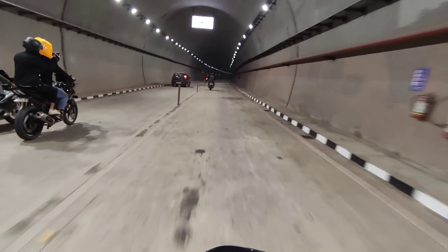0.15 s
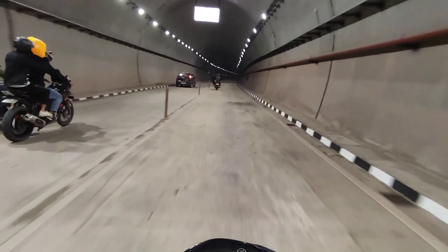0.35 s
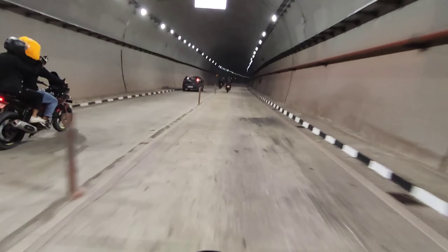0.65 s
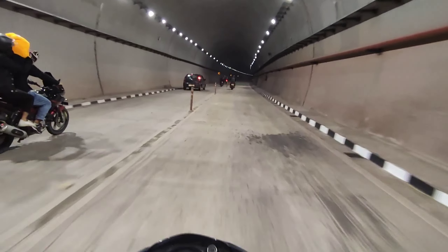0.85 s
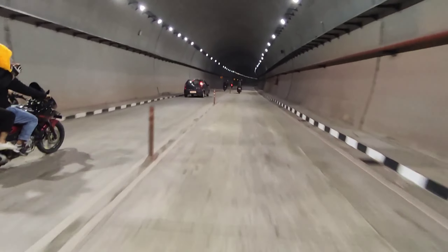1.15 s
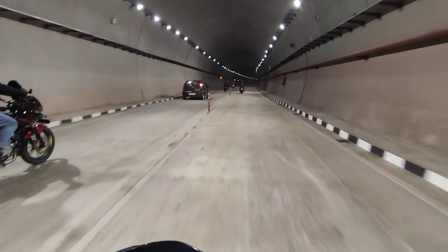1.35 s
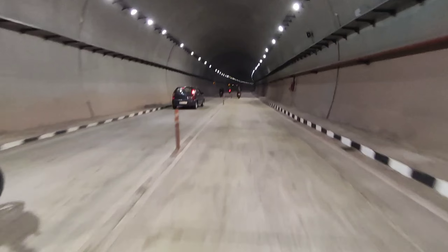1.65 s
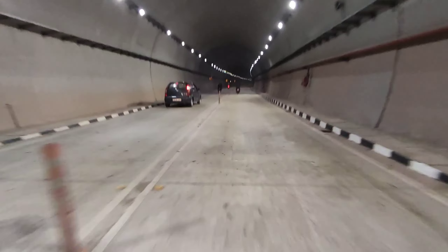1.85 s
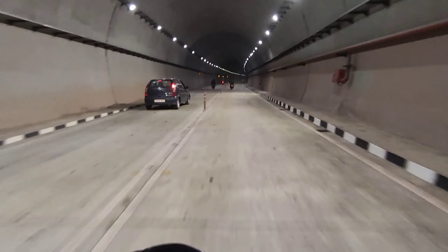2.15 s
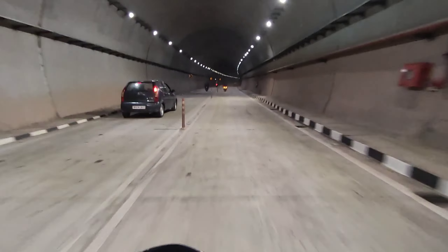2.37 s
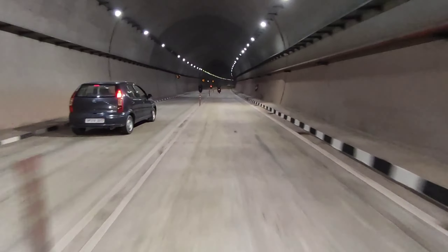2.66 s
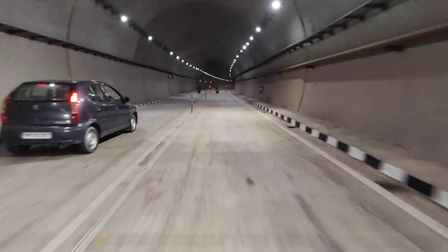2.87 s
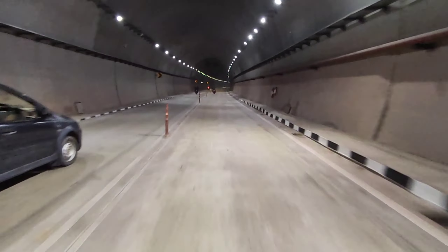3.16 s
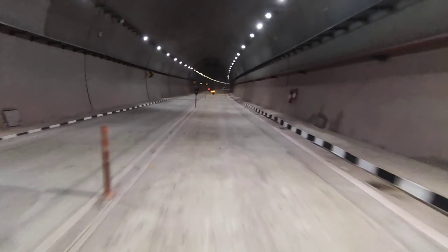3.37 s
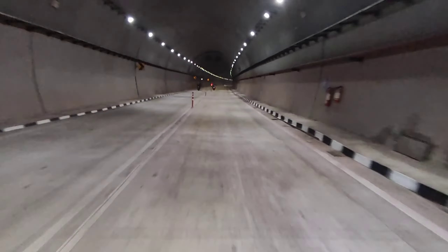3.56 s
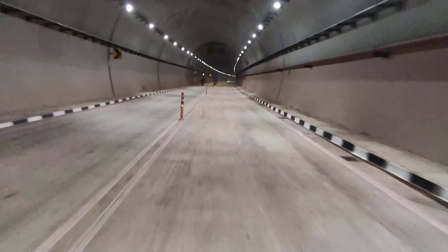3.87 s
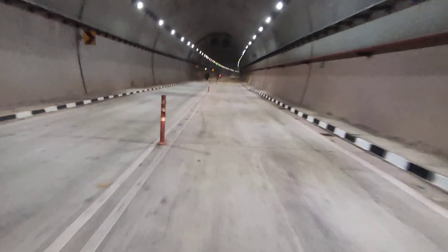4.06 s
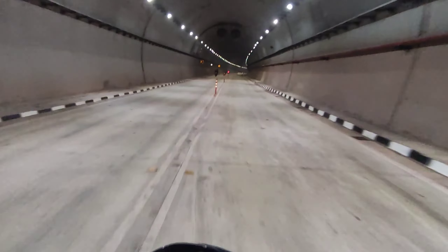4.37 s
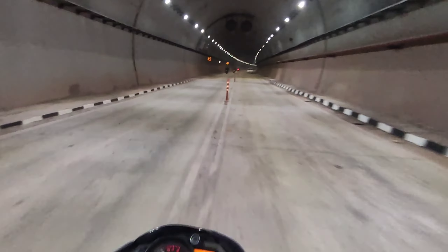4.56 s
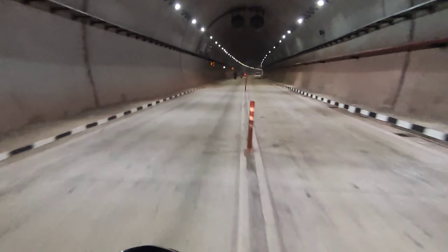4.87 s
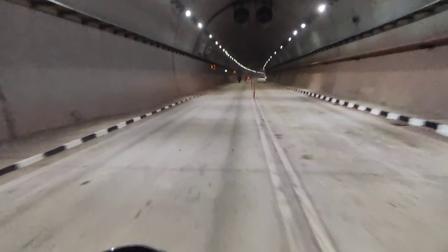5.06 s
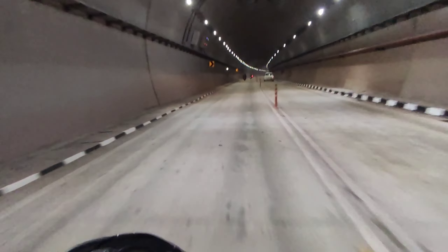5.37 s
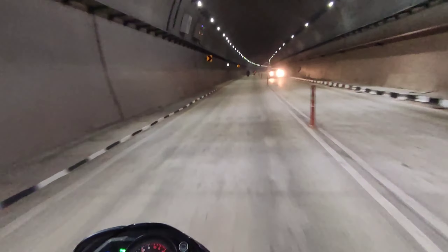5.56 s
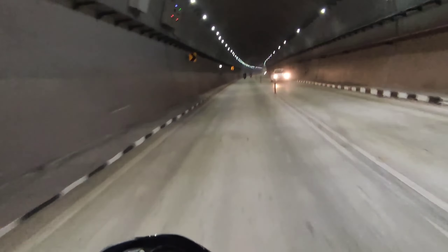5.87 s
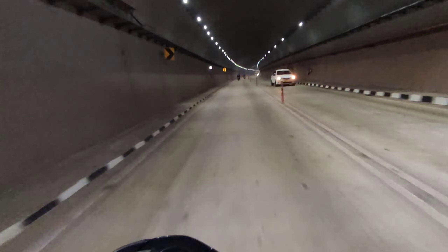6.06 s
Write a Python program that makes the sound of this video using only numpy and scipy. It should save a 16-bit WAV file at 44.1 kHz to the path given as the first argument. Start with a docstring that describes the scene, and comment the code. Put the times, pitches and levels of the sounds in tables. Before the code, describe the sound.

Heard from the saddle, a barking motorcycle engine climbs, drops and climbs again in a reverberant tunnel, with another motorcycle overtaken early amid rumble and wind.

```python
"""Motorcycle ride through a concrete tunnel

A microphone in the saddle of a single-cylinder motorcycle that changes up twice; other riders drone ahead.
Its exhaust is a stack of firing orders that swell and fade with the wall reflections; its case knocks and hisses.
Another motorcycle is overtaken, clattering first, then roaring and hissing; the ceiling fans go by later.
Shaped noise makes the traffic rumble, tyre roar, buffeting wind and slaps of air.
Noise bursts make a loose part's clacks as the machines draw level, and bare clicks make the ticks."""
import sys
import numpy as np
from scipy import signal
from scipy.fft import rfft, irfft, next_fast_len
from scipy.io import wavfile

SR = 44100
rng = np.random.default_rng(int(sys.argv[2]) if len(sys.argv) > 2 else 0)


def digitize_waveform(pressure):
    """Quantize a signal to 16-bit integers and store it at the path in sys.argv[1].

    Rows of a 2-D input are taken as channels; values are limited to [-1, 1].
    """
    field = np.atleast_2d(pressure).T
    bounded = np.clip(field, -1, 1)
    quanta = np.round(bounded * 32767).astype(np.int16)
    wavfile.write(sys.argv[1], SR, quanta)


N = 274302

# colour of the low traffic rumble and of air slapping the microphone: [f/Hz, relative level/dB per Hz]
RUMBLE_COLOUR = [(60, -9), (80, 0.5), (110, -2.5), (170, 1.5), (215, -3.5), (275, -0.5), (330, -5),
                 (420, -17.5)]
# colour of tyres on concrete: [f/Hz, relative level/dB per Hz]
ROAR_COLOUR = [(280, -8.5), (380, -5), (480, -3.5), (590, -3.5), (760, -13.5), (1100, -17.5), (2000, -27),
               (4000, -57.5)]
# colour of mechanical clatter: [f/Hz, relative level/dB per Hz]
CLATTER_COLOUR = [(650, 1.5), (800, -0.5), (930, 2), (1100, -9.5), (1600, -1.5), (1950, -5), (2300, -15),
                  (3000, -28.5)]
# colour of the hiss above the clatter: [f/Hz, relative level/dB per Hz]
HISS_COLOUR = [(1500, -24.5), (2300, 1), (3000, 0.5), (3900, -0.5), (4400, -5.5), (5000, -13), (6000, -18),
               (7200, -26), (7900, -47.5), (9000, -71.5)]


def from_db(db):
    """Amplitude factor for a level in dB."""
    return 10 ** (np.asarray(db) / 20)


def rms_one(x):
    """Scales x to rms 1."""
    return x / np.sqrt(np.mean(x ** 2) + 1e-20)


def in_time(rows):
    """Columns of a curve table, read at every sample."""
    s, *columns = np.transpose(rows)
    return [np.interp(np.arange(N) / SR, s, column) for column in columns]


def at_hz(points, hz):
    """Level of a spectrum in dB, read on a log-frequency axis."""
    points = np.array(points)
    return np.interp(np.log(hz), np.log(points[:, 0]), points[:, 1])


def coloured(x, spectrum):
    """Shapes x by a spectrum, falling steeply beyond its ends; rms 1."""
    size = next_fast_len(N + SR // 10)
    hz = np.maximum(np.fft.rfftfreq(size, 1 / SR), 1)
    lowest, highest = spectrum[0][0], spectrum[-1][0]
    skirts = np.minimum(1, np.minimum(hz / lowest, highest / hz)) ** 4
    shaped = rfft(x, size) * from_db(at_hz(spectrum, hz)) * skirts
    return rms_one(irfft(shaped, size)[:N])


def drift(rate_hz):
    """Slow chance with a spread of 1: noise through two equal low-pass poles at rate_hz."""
    # one value per 100 samples; the first 1000 values let the filter settle
    pole = np.exp(-200 * np.pi * rate_hz / SR)
    noise = rng.standard_normal(N // 100 + 1002)
    slow = signal.lfilter([1], [1, -2 * pole, pole * pole], noise)[1000:]
    return np.interp(np.arange(N) / 100, np.arange(len(slow)), rms_one(slow))


def past_walls(x, echoes):
    """The rider moves from one pattern of reflections into the next at even power; rms 1."""
    shares = np.array([drift(1.57) for _ in echoes])
    heard = sum(share * signal.fftconvolve(x, echo)[:N] for share, echo in zip(shares, echoes))
    return rms_one(heard / np.linalg.norm(shares, axis=0))


def tunnel(x, wet_db):
    """Adds a dense, long, ever-changing tail between bare concrete walls; rms 1."""
    t60_s, first_echo_s = 1.5, .012
    t = np.arange(SR) / SR
    decay = from_db(-60 * t / t60_s) * (t > first_echo_s)
    tails = rng.standard_normal((4, len(t))) * decay
    return rms_one(rms_one(x) + from_db(wet_db) * past_walls(x, tails))


def fading_line(turns, scatter, fade_rate_hz):
    """One exhaust order plus its reflections, whose phases shift as the walls go by; rms 1."""
    angle = 2 * np.pi * (turns + rng.random())
    in_phase = (1 + scatter * drift(fade_rate_hz)) * np.cos(angle)
    quadrature = scatter * drift(fade_rate_hz) * np.sin(angle)
    return rms_one(in_phase + quadrature)


def going_by(nearest_s, half_s):
    """Gain of a source passed at steady speed: one over the distance, 1 when nearest."""
    return 1 / np.hypot(1, (np.arange(N) / SR - nearest_s) / half_s)


def boom_gain(hz):
    """Strength of a low order as its pitch moves through the resonances of pipe and tube."""
    # resonances: [f/Hz, width/Hz, relative level on top/dB]
    resonances = [(58, 5.8, -23.5), (100, 6, -24.5), (122, 15, -29), (160.9, 27, -19), (181, 9.5, -26),
                  (252.5, 8.5, -20), (278.4, 18, -18), (300.6, 7, -21.5)]
    power = 0
    for centre, width, db in resonances:
        power = power + from_db(db) ** 2 / (1 + (2 * (hz - centre) / width) ** 2)
    return np.sqrt(power)


def swell(order):
    """Gain of one order past the spots where wall reflections add up or cancel."""
    # spots where an order flares or fades: [t/s, order, change of level/dB, half-length/s]
    spots = [(0.111, 1, 11, 0.15), (0.246, 4, 7.5, 0.093), (0.289, 6, 8, 0.26), (0.306, 3, 0, 0.26),
             (0.345, 9, -4.5, .3), (0.496, 5, 0.5, 0.16), (0.645, 10, 7.5, 0.11), (0.648, 15, 10.5, .45),
             (0.753, 8, 5, .25), (0.995, 2, 6, 0.23), (1.019, 5, 5, 0.24), (1.18, 7, 9.5, 0.38),
             (1.756, 3, 11.5, 0.11), (2.196, 3, 7, .2), (2.197, 7, 4.5, .18), (2.249, 5, 4, 0.13),
             (2.278, 2, 8.5, 0.15), (2.291, 11, 4, 0.23), (2.399, 12, -2, .4), (2.404, 6, 6.5, 0.28),
             (2.449, 10, 9, .32), (2.515, 5, -10, 0.071), (2.75, 5, 5, 0.22), (3.1, 5, -6.5, 0.12),
             (3.114, 1, 8.5, .2), (3.348, 3, -1, 0.12), (3.564, 7, 9, 0.15), (3.575, 10, 13, 0.063),
             (3.696, 4, 5.5, 0.14), (3.965, 3, -12, 0.16), (3.986, 5, -7.5, 0.057), (4.057, 8, 9, 0.26),
             (4.197, 1, 3.5, .3), (4.35, 6, 5.5, 0.18), (4.408, 9, 9, 0.19), (4.552, 5, 3, 0.094),
             (4.603, 10, 3.5, 0.55), (4.604, 11, 5, 0.26), (4.759, 9, 7, .15), (4.782, 3, -7.5, 0.14),
             (4.997, 7, 8, 0.15), (5.164, 4, 6.5, 0.27), (5.297, 10, 5.5, 0.2), (6.104, 3, 2, 0.12),
             (6.16, 5, 7, 0.11)]
    t = np.arange(0, N / SR, .005)
    level_db = 0 * t
    for s, k, db, half_s in spots:
        if round(k) == order:
            level_db = level_db + db * np.exp(-((t - s) / half_s) ** 2)
    return np.interp(np.arange(N) / SR, t, from_db(level_db))


def overrun():
    """Gain of the exhaust, which loses its bark around each change of gear while the engine is not pulling."""
    # drops of the exhaust: [middle t/s, half-length/s, change of level/dB]
    drops = [(1.578, 0.31, -4), (1.881, 0.05, -3.5), (5.708, 0.26, -4)]
    t = np.arange(N) / SR
    return from_db(sum(db / (1 + ((t - s) / half_s) ** 8) for s, half_s, db in drops))


def exhaust(firing_hz, turns, throttle_db):
    """Low orders boom in the resonances, the others bark through the silencer; the tunnel adds a dull tail."""
    # multiples of the firing rate that boom: [order]
    booming_orders = (1, 2, 3, 5)
    # silencer's response at the other orders: [f/Hz, relative level/dB]
    silencer = [(200, -27), (250, -30.5), (310, -23.5), (380, -27), (440, -30.5), (490, -28.5),
                (545, -27.5), (610, -29), (680, -32.5), (780, -46), (950, -43.5)]
    boom = 0
    for k in booming_orders:
        line = fading_line(k * turns, scatter=0.22, fade_rate_hz=7.3)
        pull = from_db(0.11 * k * throttle_db)  # higher orders follow the throttle more
        boom = boom + boom_gain(k * firing_hz) * pull * swell(k) * line
    bark = 0
    for k in range(4, 18):
        if k not in booming_orders:
            line = fading_line(k * turns, scatter=0.33, fade_rate_hz=5)
            bark = bark + from_db(at_hz(silencer, k * firing_hz)) * swell(k) * line
    unevenness = from_db(.7 * drift(35))  # the strength of the firings wavers
    direct = (from_db(1.0) * boom + from_db(throttle_db) * bark) * unevenness * overrun()
    dull = signal.butter(4, 2500, fs=SR, output="sos")  # takes the top off direct sound and tail alike
    return direct.std() * signal.sosfilt(dull, tunnel(direct, wet_db=-13.5))


def rasp(turns, throttle_db):
    """Under load the high orders buzz; walls smear each pulse, near echoes favour a few orders at a time."""
    # colour of the buzz: [f/Hz, relative level/dB per Hz]
    rasp_colour = [(800, -0.5), (1050, -7.5), (1250, -1), (1420, -4.5), (1650, -4.5), (1900, -7),
                   (2200, -18)]
    smear_s, near_echo_s, near_echo_share = .02, .003, .7
    pulses = np.diff(np.floor(turns), prepend=0)
    t = np.arange(SR // 10) / SR
    walls = rfft(rng.standard_normal((4, len(t))) * np.exp(-t / smear_s))
    smear = walls / np.abs(walls)  # spreads in time, keeps every pitch at equal strength
    near = rng.standard_normal((len(walls), len(t))) * np.exp(-t / near_echo_s)
    near = near / np.linalg.norm(near, axis=1, keepdims=True)
    ripple = 1 + near_echo_share * rfft(near)
    buzz = past_walls(pulses, irfft(ripple * smear))
    level = from_db(-31.5 + 1.4 * throttle_db)
    return level * overrun() * coloured(buzz, rasp_colour)


def effort_gain(law, firing_hz, throttle_db):
    """Mechanical noise grows with throttle and engine speed."""
    cruise_db, follows, db_per_hz = law
    cruise_hz = 55
    return from_db(cruise_db + follows * throttle_db + db_per_hz * (firing_hz - cruise_hz))


def clatter(firing_hz, turns, throttle_db):
    """Each firing knocks on the engine case and lets out a puff of hiss; the walls throw both back."""
    # how body and hiss grow: [level at cruise/dB, share of throttle swing, dB per extra firing per s]
    body_law = (-30.5, 0.98, 0.14)
    hiss_law = (-42.5, 0.59, 0.49)
    # play in the parts: knocks come a little early or late, in fractions of a firing
    loose_turns = turns + .004 * drift(36)
    knocks = np.diff(np.floor(loose_turns), prepend=0) * from_db(2.2 * rng.standard_normal(N))
    # the many modes of the case smear each knock in time without favouring any pitch
    t = np.arange(SR // 40) / SR
    modes = rfft(rng.standard_normal(len(t)) * np.exp(-t / 0.0043))
    knocks = rms_one(signal.fftconvolve(knocks, irfft(modes / np.abs(modes)))[:N])
    # steady noise plus a puff that dies away within each firing
    puff_shape = 1.4 + np.exp(-(turns % 1) / 0.12)
    puffs = rms_one(rng.standard_normal(N) * puff_shape)
    body = coloured(tunnel(.35 * knocks + puffs, wet_db=1), CLATTER_COLOUR)
    hiss = coloured(tunnel(puffs, wet_db=0.0), HISS_COLOUR)
    body = effort_gain(body_law, firing_hz, throttle_db) * body
    hiss = effort_gain(hiss_law, firing_hz, throttle_db) * hiss
    return body + hiss


def neighbour():
    """The other exhaust goes by; its low orders come direct, the higher ones by way of the walls."""
    # the overtaken motorcycle eases off as it is passed: [t/s, firings per s]
    speed = [(0, 48.8), (.45, 51.6), (.8, 51.1), (1.15, 50.2), (1.6, 49)]
    # its exhaust orders: [f/Hz, relative level/dB]
    order_levels = [(50, -12.5), (100, -2.5), (150, -9.5), (200, -13.5), (250, -9), (400, -22),
                    (700, -24.5)]
    firing_hz, = in_time(speed)
    turns = np.cumsum(firing_hz) / SR
    lines = 0
    for k in range(1, 13):
        line = fading_line(k * turns, scatter=.15 * k, fade_rate_hz=2 + k)
        lines = lines + from_db(at_hz(order_levels, k * firing_hz.mean())) * line
    return from_db(-15) * going_by(nearest_s=.8, half_s=0.23) * rms_one(lines)


def far_engines():
    """Two wavering low orders carry from the riders ahead."""
    # their engine note: [t/s, f/Hz, level of the lower order/dB]
    drone = [(0, 109.4, -24.5), (1, 113.6, -19), (1.7, 116.3, -19.5), (2.9, 116.3, -32.5),
             (3.5, 122, -33.5), (4.2, 114.9, -30.5), (5.3, 123.9, -34), (5.7, 127.6, -20.5),
             (6.22, 122.7, -23)]
    hz, level_db = in_time(drone)
    turns = np.cumsum(hz) / SR
    low = fading_line(turns, scatter=.3, fade_rate_hz=4)
    octave = from_db(-18.0) * fading_line(2 * turns, scatter=0.9, fade_rate_hz=8.7)
    return from_db(level_db) * (low + octave)


def road_and_wind():
    """Traffic rumbles in the tube, tyres roar on concrete, lumpy wind hits the microphone in gusts."""
    # colour of wind on the microphone: [f/Hz, relative level/dB per Hz]
    wind_colour = [(8, -5), (14, -1), (30, -9), (50, -2.5), (80, -13.5), (150, -19), (400, -18.5)]
    rumble = from_db(-20.5) * coloured(rng.standard_normal(N), RUMBLE_COLOUR)
    roar = from_db(-24) * coloured(rng.standard_normal(N), ROAR_COLOUR)
    gusts_db = 1.5 * drift(2.2)
    buffeting_db = drift(14)
    wind_gain = from_db(-19 + gusts_db + buffeting_db)
    wind = wind_gain * coloured(rng.standard_normal(N), wind_colour)
    return rumble + roar + wind


def passing_noise():
    """Each thing that goes by swells and fades with its own mix of rumble, roar, clatter and hiss."""
    # the other motorcycle's tail, flank and engine, then the ceiling fans:
    # [nearest t/s, half-length/s, rumble level/dB, roar level/dB, clatter level/dB, hiss level/dB]
    passes = [(0.462, .16, -14.5, -35, -29, -44.5), (0.897, 0.32, -28.5, -29, -29, -40.5),
              (1.425, 0.35, -15, -19, -36.5, -37.5), (5.532, 0.43, -22, -19.5, -34, -39.5)]
    out = 0
    for k, colour in enumerate((RUMBLE_COLOUR, ROAR_COLOUR, CLATTER_COLOUR, HISS_COLOUR)):
        power = 0
        for nearest_s, half_s, *levels_db in passes:
            power = power + (from_db(levels_db[k]) * going_by(nearest_s, half_s)) ** 2
        out = out + np.sqrt(power) * coloured(rng.standard_normal(N), colour)
    return out


def ticks():
    """A dry, sharp tick: a click lasting a fraction of a millisecond."""
    # ticks: [t/s, relative height]
    tick_times = [(.431, 0.037), (0.4695, 0.52), (1.130, .018), (1.354, 0.022), (1.388, 0.045),
                  (1.610, 0.022), (2.166, .018), (2.270, .014), (2.290, .016), (2.308, .015),
                  (3.553, 0.026), (5.369, .015)]
    # colour of a tick: [f/Hz, relative level/dB per Hz]
    tick_colour = [(1500, -17.5), (3500, -1), (6500, 0), (8000, -5.5), (9600, -12), (12000, -6.5),
                   (16000, -15)]
    clicks = np.zeros(N)
    for s, height in tick_times:
        clicks[round(s * SR)] = height
    return from_db(1.0) * clicks.std() * coloured(clicks, tick_colour)


def buffets():
    """A single slap of air on the microphone is a short swell of low, lumpy noise."""
    # slaps: [t/s, level/dB, half-length/s]
    slaps = [(0.54, -13, 0.018), (4.557, -9, 0.014), (5.025, -11.5, 0.012)]
    t = np.arange(N) / SR
    level = sum(from_db(db) * np.exp(-((t - s) / half_s) ** 2) for s, db, half_s in slaps)
    return level * coloured(rng.standard_normal(N), RUMBLE_COLOUR)


def rattles():
    """A loose part clacks: noise builds and dies within milliseconds, with a weak echo off the wall."""
    # clacks as the two machines draw level: [t/s, relative level/dB]
    clacks = [(1.222, -21.5), (1.286, -26), (1.302, -26.5), (1.312, -32), (1.372, -27.5), (1.381, -27),
              (1.419, -28), (1.446, -32), (1.528, -26), (1.536, -24), (1.601, -21.5)]
    # colour of a clack: [f/Hz, relative level/dB per Hz]
    rattle_colour = [(500, -6), (900, 4.5), (2000, 7), (4000, -1), (5200, -8.5), (7200, -22), (8000, -38),
                     (9000, -76)]
    attack_s, decay_s, echo_share, echo_s = .0007, .005, .22, .04
    age = np.arange(SR // 10) / SR
    dying = np.exp(-age / decay_s) + echo_share * np.exp(-age / echo_s)
    clack = (1 - np.exp(-age / attack_s)) * dying
    level = np.zeros(N)
    for s, db in clacks:
        start = round(s * SR)
        level[start:start + len(age)] += from_db(db) * clack
    flutter = from_db(2.5 * drift(90))  # the part chatters
    bursts = level * flutter * rng.standard_normal(N)
    return bursts.std() * coloured(bursts, rattle_colour)


def scene():
    """Speed and throttle drive the rider's engine; other traffic, road and wind surround it."""
    # own engine: [t/s, firings per s]
    speed = [(0, 52), (.3, 54.2), (.7, 57.6), (1.25, 61.8), (1.45, 62.2), (1.81, 59), (1.9, 49.2),
             (2.15, 50.4), (2.55, 52), (2.95, 53.1), (3.2, 53.3), (3.78, 55.1), (4.2, 56.6), (4.59, 58.8),
             (5.0, 60.1), (5.2, 60.2), (5.5, 61.1), (5.7, 60.0), (5.85, 50.5), (6.22, 51.4)]
    # throttle, which drives boom, bark, rasp, clatter and hiss: [t/s, relative level/dB]
    throttle = [(0, 3.5), (.07, -8), (.2, 0.5), (1.0, -2), (1.6, 0), (1.76, -6.5), (2.0, 0), (2.3, -1.5),
                (2.85, -2), (3.18, -9.5), (3.42, -1), (3.8, -0.5), (4.12, -3), (4.5, -1.5), (4.85, -0.5),
                (5.17, 0.2), (5.45, 0), (5.72, -5), (5.95, -2), (6.22, -2)]
    firing_hz, = in_time(speed)
    throttle_db, = in_time(throttle)
    turns = np.cumsum(firing_hz * (1 + 0.00199 * drift(8.4))) / SR  # counted in firings, slightly unsteady
    own = exhaust(firing_hz, turns, throttle_db)
    own = own + rasp(turns, throttle_db) + clatter(firing_hz, turns, throttle_db)
    traffic = neighbour() + far_engines() + passing_noise()
    surroundings = road_and_wind() + buffets() + rattles() + ticks()
    return (own + traffic + surroundings)[None]


def record(dry):
    """A very faint noise floor lies under everything; a soft start, overloaded highest peaks, the top cut."""
    # colour of the steady noise floor: [f/Hz, relative level/dB per Hz]
    floor_colour = [(9000, -7), (11000, -6.5), (12200, 3.5), (15500, -4)]
    fade_in_s, cutoff_hz = .004, 15750
    dry = dry + from_db(-92) * coloured(rng.standard_normal(N), floor_colour)
    fade = np.minimum(1, np.arange(N) / SR / fade_in_s)
    dry = dry * np.sin(np.pi / 2 * fade) ** 2
    clipped = dry / (1 + np.abs(dry) ** 24) ** (1 / 24)
    top_cut = signal.cheby2(12, 60, cutoff_hz, fs=SR, output="sos")  # 60 dB down from the cutoff up
    return signal.sosfilt(top_cut, clipped)


dry = scene()
out = record(dry)
digitize_waveform(out)
```